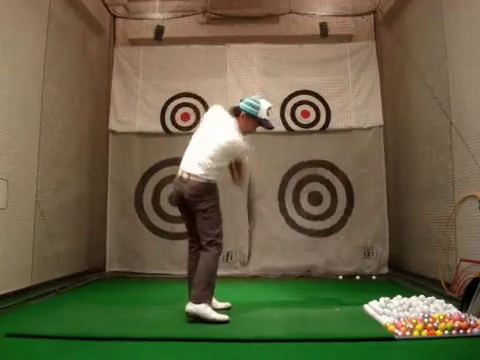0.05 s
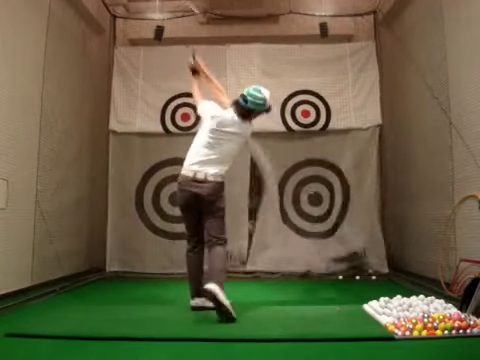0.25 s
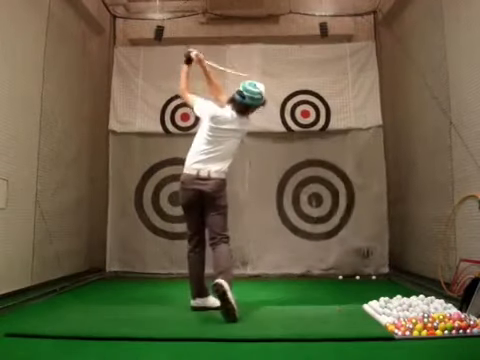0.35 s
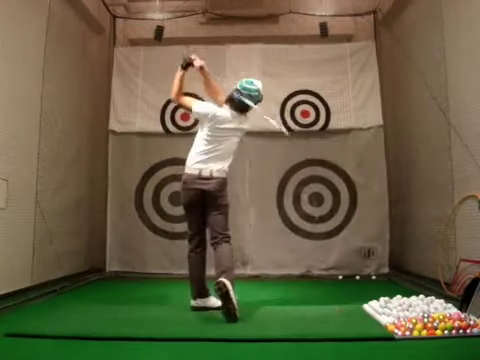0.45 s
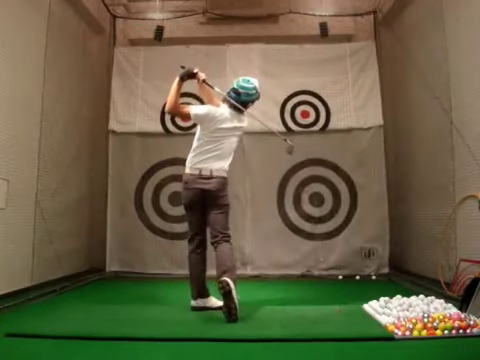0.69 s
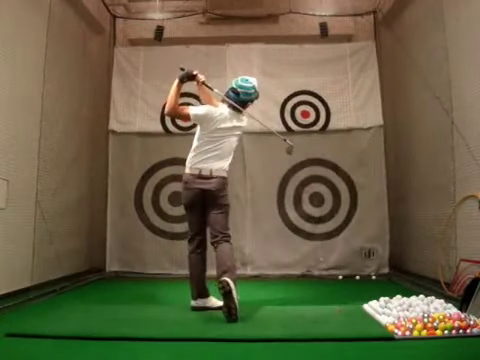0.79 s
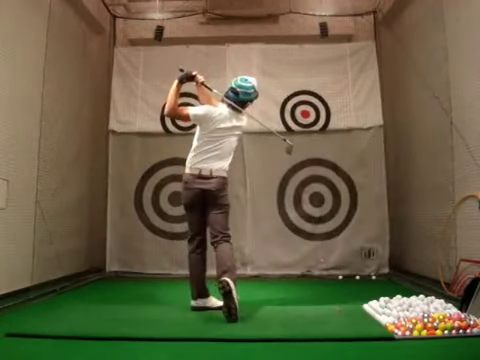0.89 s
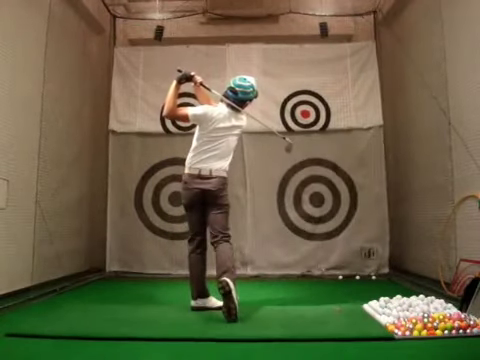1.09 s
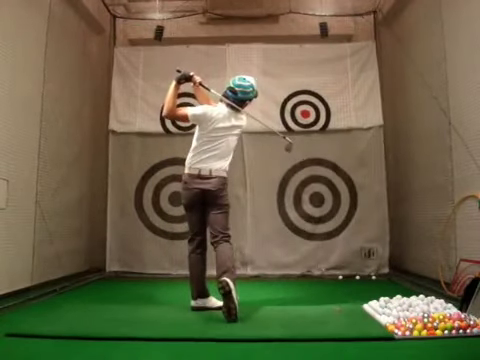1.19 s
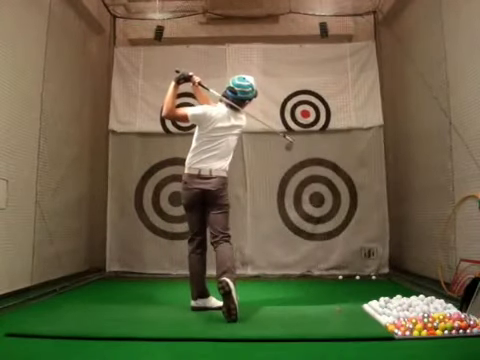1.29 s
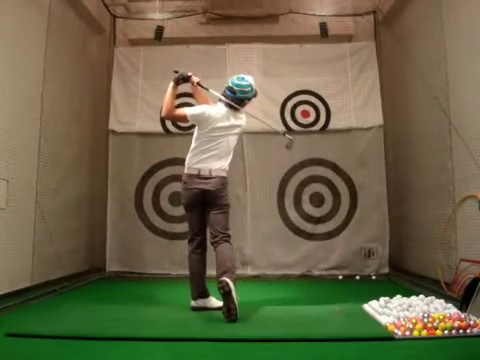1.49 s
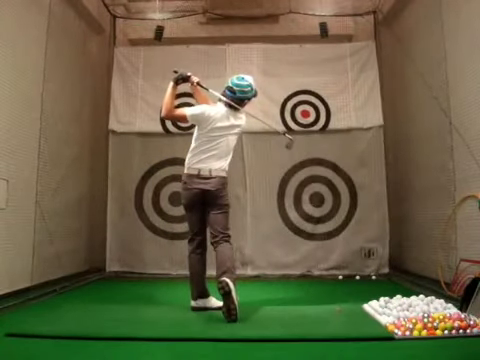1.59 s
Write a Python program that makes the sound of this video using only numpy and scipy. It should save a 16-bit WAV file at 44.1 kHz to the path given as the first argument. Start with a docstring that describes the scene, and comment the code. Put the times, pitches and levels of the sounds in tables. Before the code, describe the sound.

A golf club swishes briefly and hits a ball with one sharp, ringing crack. The ball thumps into a hanging sheet and drops softly onto the mat. Faint ventilation hisses in a small, hard-walled bay, heard from behind the player.

```python
"""A golf swing in a small, hard-walled practice bay. Ventilation hisses and hums from the start.
The shaft whistles and the head rushes through the air; the face cracks against the ball, flattened
by a limiter, and the hollow head and the bay ring. The ball thumps into the hanging target sheet,
slides down it and drops on the mat. Last, a shoe turns on the turf."""
import sys
import numpy as np
from scipy import signal
from scipy.fft import rfft, irfft
from scipy.io import wavfile

SR = 44100
rng = np.random.default_rng(int(sys.argv[2]) if len(sys.argv) > 2 else 0)


def store_wav(level_fs):
    """Save 16-bit WAV to argv[1]."""
    pcm = np.round(np.clip(np.atleast_2d(level_fs), -1, 1) * 32767)
    wavfile.write(sys.argv[1], SR, pcm.T.astype(np.int16))


N = 72765
T = np.arange(N) / SR

# face on ball: (frequency [Hz], relative level [dB])
CRACK_SPECTRUM = [(60, -22), (400, -14), (900, -3), (2000, 3.5), (4400, 0.5), (6000, -12), (9000, -6),
                  (11000, -22), (16000, -14)]
# hollow club head: (frequency [Hz], relative level [dB], t60 [s])
HEAD_MODES = [(833.5, -5, 0.67), (1294, -4, .6), (1842, -5, 0.66), (2056, -6.5, 0.92), (2566, -4, 0.46),
              (2707, 2.5, 0.56), (3130, 4, .4), (3478, 3, .45), (3699, 7, 0.3), (3892, -3, 0.68),
              (5040, -3.5, 0.85), (5660, -5, 0.85), (7170, -15, 0.44), (7990, 0, 0.49), (8040, -5, 0.33)]
# crack as the bay returns it: (frequency [Hz], relative level [dB])
RING_SPECTRUM = [(40, -27), (120, -25), (300, -18.5), (600, -12), (950, -7.5), (1400, -2.5), (1800, 0.5),
                 (2800, -1.5), (4000, -2), (5000, -5.5), (6200, -5), (8300, -8.5), (9800, -13.5),
                 (10600, -22), (16000, -18.5)]

def strike(bay_db=-7.5, crack_db=-9, head_db=-27.5, impact_s=.2188):
    """The face cracks on the ball; the ringing head and the wall reflections swell behind it."""
    crack = from_db(crack_db) * noise(CRACK_SPECTRUM) * burst(attack_s=.0019, t60_s=.018)
    head = np.zeros(N)
    for hz, db, t60_s in HEAD_MODES:
        mode = from_db(head_db + db) * np.sin(2 * np.pi * hz * T)
        waver = 1 + .8 * drift(rate_hz=45.4)
        head += mode * burst(attack_s=.017, t60_s=t60_s) * waver
    ring = from_db(bay_db) * echoes(RING_SPECTRUM, build_s=.034)
    return np.interp(T - impact_s, T, crack + head + ring, left=0)


# club through the swing: (time [s], relative speed [1])
CLUB_SPEED = [(.125, .25), (.152, 0.53), (.176, .6), (.182, 0.88), (.192, .85), (.203, 0.931),
              (.2135, 1.04), (.218, 0.66), (.25, .3), (.3, 0.057)]
# air torn by the head: (frequency [Hz], relative level [dB])
RUSH_SPECTRUM = [(60, -38), (150, -14.5), (300, -1.5), (500, 2.5), (800, 1), (1400, -2.5), (3000, -14),
                 (6000, -18.5), (9500, -28), (11000, -28.5), (16000, -31)]

def swing(bay):
    """Vortices shed by the shaft whistle higher and louder with speed; the head adds a rush of air."""
    whistle_hz, whistle_db, rush_db = 525.7, -18, -26   # at speed 1
    speed = np.interp(T, *np.transpose(CLUB_SPEED), left=0, right=0)
    pitch_hz = whistle_hz * speed * (1 + .044 * drift(rate_hz=180))
    phase = 2 * np.pi * np.cumsum(pitch_hz) / SR
    roughness = 1 + .16 * drift(rate_hz=250)
    whistle = from_db(whistle_db) * speed ** 6.2 * np.sin(phase) * roughness
    rush = from_db(rush_db) * speed ** 2.55 * noise(RUSH_SPECTRUM)
    return in_bay(whistle + rush, bay, wet_db=-16.5)


# ball on sheet, then mat: (time [s], level [dB], attack [s], t60 [s], pitch [Hz], reverb [dB])
BALL_HITS = [(.278, -18, 0.005, 0.21, 314, -6), (.291, -15.5, 0.0032, .18, 800, -5.5),
             (0.317, -19, 0.0057, .24, 950, -6.5), (0.34, -25, .008, .16, 312, -11),
             (.908, -35.5, 0.0037, 0.18, 520, -6), (.925, -36.5, 0.0057, .27, 760, -6.5)]
# one hit: (multiple of pitch [1], relative level [dB])
THUD_SPECTRUM = [(.1, -31), (.3, -17), (.55, -5.5), (1.0, 3.5), (1.4, -2), (2.5, -14), (6.0, -22),
                 (25, -53)]

def ball_thuds(bay):
    """Soft surfaces stop the ball with a broad, low thump."""
    thuds = np.zeros(N)
    for start_s, db, attack_s, t60_s, pitch_hz, wet_db in BALL_HITS:
        spectrum = [(pitch_hz * ratio, band_db) for ratio, band_db in THUD_SPECTRUM]
        thud = from_db(db) * burst(attack_s, t60_s, start_s) * noise(spectrum)
        thuds += in_bay(thud, bay, wet_db)
    return thuds


# cloth and turf brushing: (time [s], level [dB], attack [s], t60 [s])
BRUSHES = [(.535, -44.5, .02, 0.76), (.715, -47, 0.049, 0.95), (0.86, -39, 0.018, .58),
           (1.25, -49, 0.008, 1.2)]
# brushing noise: (frequency [Hz], relative level [dB])
BRUSH_SPECTRUM = [(60, -25), (250, -7), (600, 0), (1300, 1.5), (3500, -1), (5500, -4.5), (9900, -9),
                  (10600, -19.5), (16000, -18)]

def rustles(grain_db=.5):
    """Grainy brushing as the sheet swings back, the ball slides down and a shoe turns."""
    power = sum((from_db(db) * burst(attack_s, t60_s, start_s)) ** 2
                for start_s, db, attack_s, t60_s in BRUSHES)
    grains = rng.standard_normal(N) * from_db(grain_db * drift(rate_hz=600))
    return np.sqrt(power) * colour(grains, BRUSH_SPECTRUM)


# fan hum: (time [s], level [dB])
HUM_LEVEL = [(0, -75), (.75, -76.5), (.95, -65), (1.25, -69), (1.36, -64.5), (1.65, -62.5)]
# narrow ventilation resonances: (frequency [Hz], width [Hz], level [dB])
VENT_RESONANCES = [(651, 100, -61), (1658, 42, -57.5)]
# ventilation air: (frequency [Hz], relative level [dB])
AIR_SPECTRUM = [(25, -27), (75, -17), (130, -15.5), (185, -6.5), (220, -8), (290, -3.5), (380, -5.5),
                (520, -0.5), (900, -1), (1200, -2), (1420, -4), (1750, -4), (2100, -4.5), (3000, -7),
                (4500, -13), (6400, -17), (8000, -17), (9900, -23), (10700, -28.5), (13000, -29),
                (16000, -25)]

def ventilation(air_db=-48, hum_hz=120):
    """Moving air hisses, two resonances whine faintly and the fan's hum wavers."""
    hum_rms = from_db(np.interp(T, *np.transpose(HUM_LEVEL)))
    hum = hum_rms * np.sqrt(2) * np.sin(2 * np.pi * hum_hz * T)
    whines = np.zeros(N)
    for hz, width_hz, db in VENT_RESONANCES:
        resonator = signal.iirpeak(hz, hz / width_hz, fs=SR)
        whines += from_db(db) * unit_rms(signal.lfilter(*resonator, rng.standard_normal(N)))
    air = from_db(air_db) * noise(AIR_SPECTRUM)
    return air + whines + hum * (1 + .34 * drift(rate_hz=9.84))


# bay reverberation: (frequency [Hz], t60 [s])
BAY_DECAY = [(100, .7), (300, 0.55), (600, 0.74), (1000, 0.66), (1800, 0.6), (3500, 0.6), (7000, 0.56),
             (14000, 0.54)]

def echoes(spectrum, build_s, initial_per_s=12000, doubling_s=.02):
    """The bay's answer to a click: ever denser reflections that swell, then die band by band."""
    density = np.minimum(initial_per_s / SR * 2 ** np.minimum(T / doubling_s, 20), 1)
    taps = rng.standard_normal(N) * (rng.random(N) < density) / np.sqrt(density)
    bins, hz = rfft(colour(taps, spectrum)), np.fft.rfftfreq(N, 1 / SR)
    centres_hz, t60s = np.transpose(BAY_DECAY)
    bands = [irfft(bins * at_hz(np.c_[centres_hz, share], hz), N) for share in np.eye(len(t60s))]
    return sum(band * burst(build_s, t60_s) for band, t60_s in zip(bands, t60s))


# wall reflections: (frequency [Hz], relative level [dB])
WALL_SPECTRUM = [(100, -3.5), (400, -0.5), (16000, -4)]

def bay_response():
    """Impulse response of the hard walls, at unit energy."""
    response = echoes(WALL_SPECTRUM, build_s=.0091)
    return response / np.linalg.norm(response)


def in_bay(x, bay, wet_db):
    """Direct sound plus reverberation."""
    return x + from_db(wet_db) * signal.fftconvolve(x, bay)[:N]


def from_db(db):
    """Decibels to gain."""
    return 10 ** (np.asarray(db) / 20)


def unit_rms(x):
    """Scale to rms 1."""
    return x / np.sqrt(np.mean(x ** 2) + 1e-20)


def at_hz(points, hz):
    """Interpolate a table along log frequency."""
    points_hz, values = np.transpose(points)
    return np.interp(np.log(np.maximum(hz, 1)), np.log(points_hz), values)


def colour(x, spectrum):
    """Filter by a spectrum; rms 1."""
    gain = from_db(at_hz(spectrum, np.fft.rfftfreq(N, 1 / SR)))
    return unit_rms(irfft(rfft(x) * gain, N))


def noise(spectrum):
    """Coloured noise; rms 1."""
    return colour(rng.standard_normal(N), spectrum)


def drift(rate_hz):
    """Straight lines between unit Gaussian draws."""
    return np.interp(T * rate_hz, np.arange(N), rng.standard_normal(N))


def burst(attack_s, t60_s, start_s=0):
    """Linear rise, exponential decay."""
    age_s = T - start_s
    return np.clip(age_s / attack_s, 0, 1) * from_db(-60 * np.maximum(age_s - attack_s, 0) / t60_s)


def smooth(x, tau_s):
    """One-pole low-pass."""
    pole = np.exp(-1 / (tau_s * SR))
    return signal.lfilter([1 - pole], [1, -pole], x)


def release(duck_db, db_per_s):
    """Follow each rise at once, let go at a steady rate."""
    return np.maximum.accumulate(duck_db + db_per_s * T) - db_per_s * T


def scene():
    """All sources in mono, heard from behind the player."""
    bay = bay_response()
    return (swing(bay) + strike() + ball_thuds(bay) + rustles() + ventilation())[None]


def record(dry):
    """A limiter ducks loud sound and recovers in two stages; peaks are rounded and the top is cut."""
    threshold_db, slope, slow_share = -15, .62, .54
    ceiling, cutoff_hz = .53, 16000
    level_db = 10 * np.log10(smooth(dry[0] ** 2, tau_s=.0041) + 1e-12)
    duck_db = slope * np.maximum(level_db - threshold_db, 0)
    held_db = np.maximum(release(duck_db, db_per_s=78), release(slow_share * duck_db, db_per_s=6.5))
    gain = from_db(-smooth(held_db, tau_s=.00054))
    rounded = ceiling * np.tanh(dry * gain / ceiling)
    lowpass = signal.ellip(12, .2, 70, cutoff_hz, fs=SR, output="sos")
    return signal.sosfilt(lowpass, rounded)


dry = scene()
out = record(dry)
store_wav(out)
```